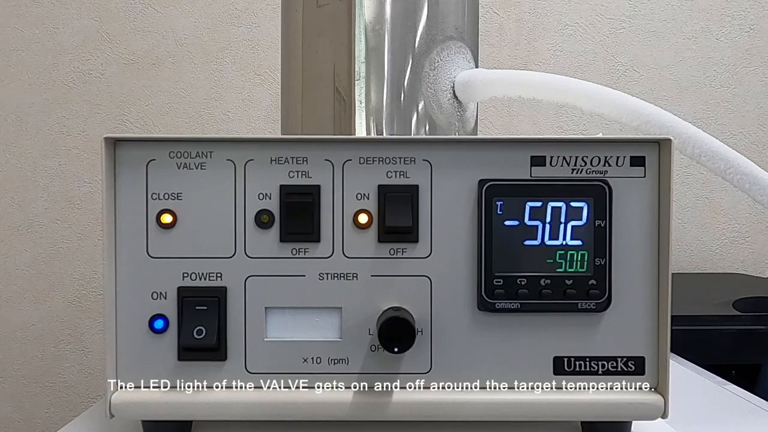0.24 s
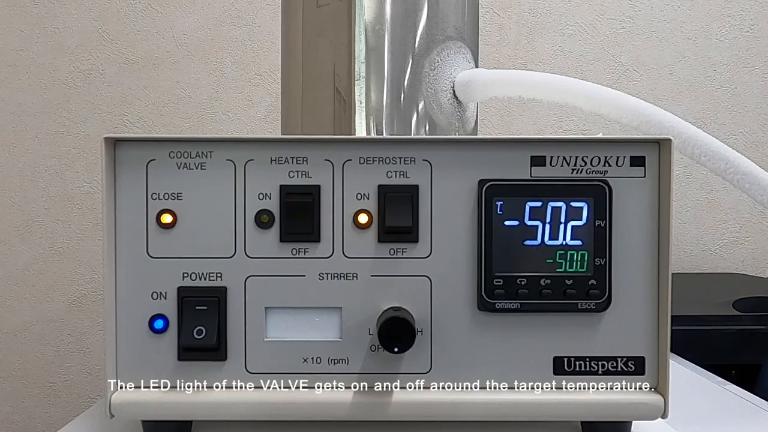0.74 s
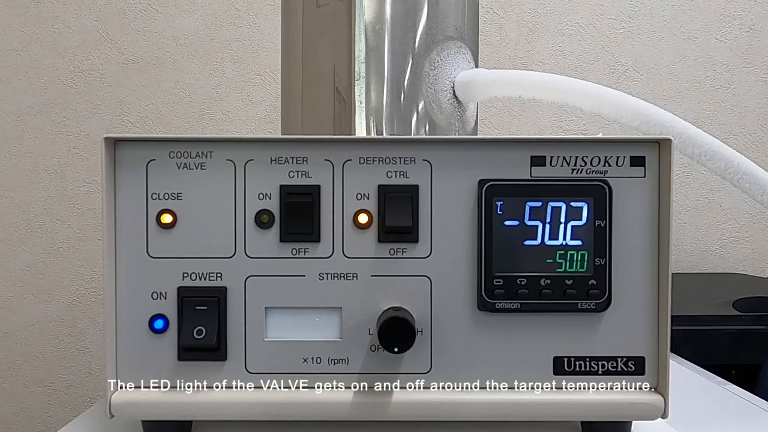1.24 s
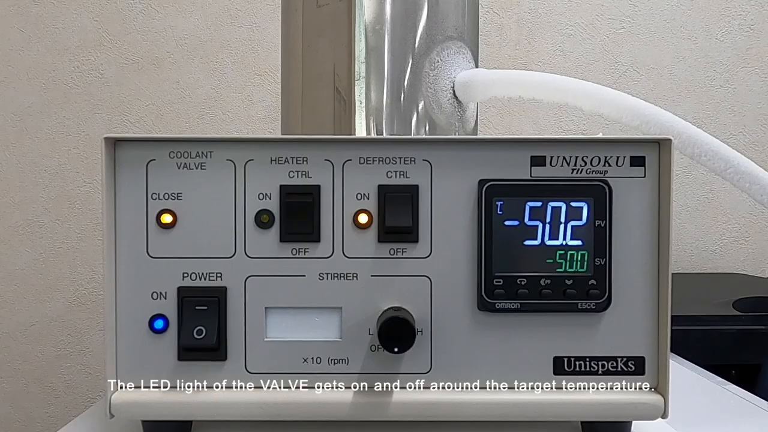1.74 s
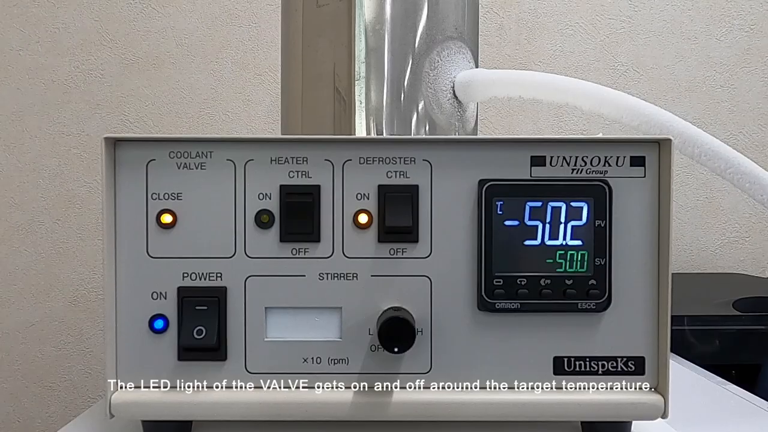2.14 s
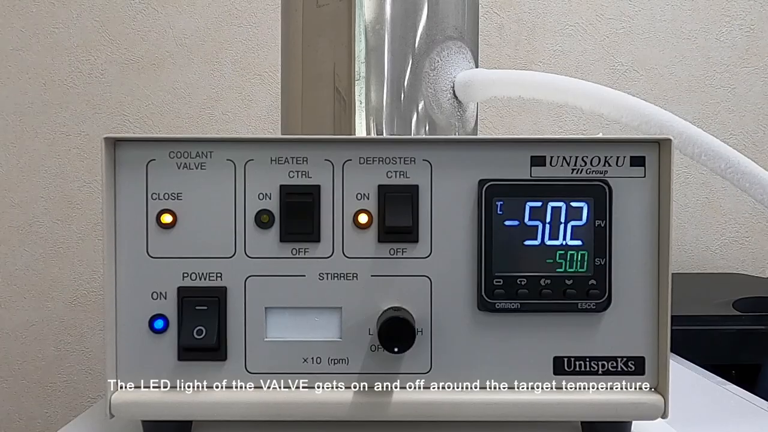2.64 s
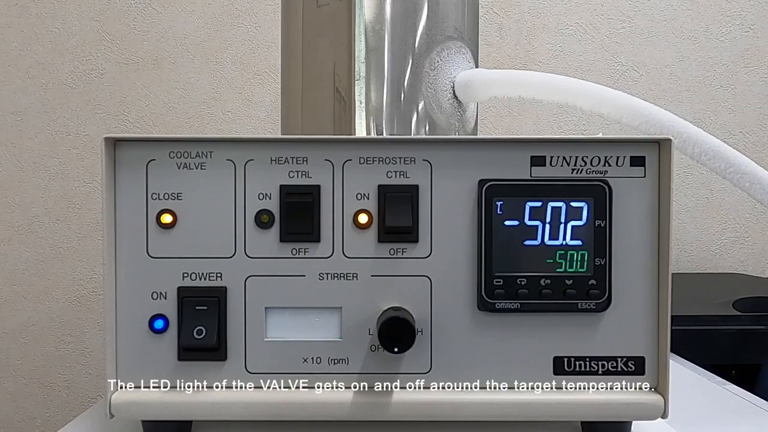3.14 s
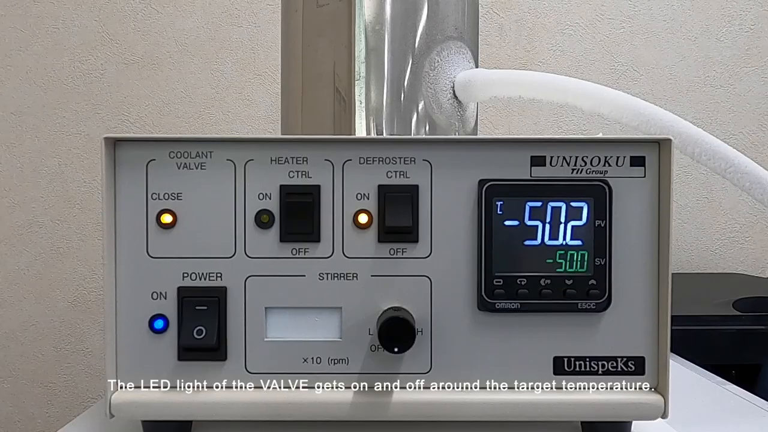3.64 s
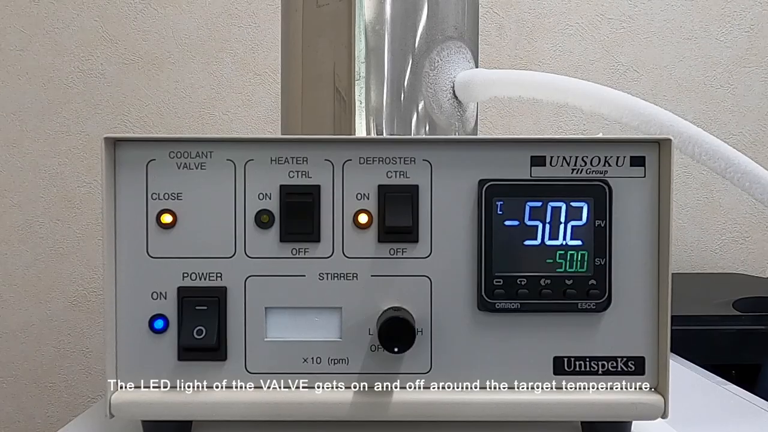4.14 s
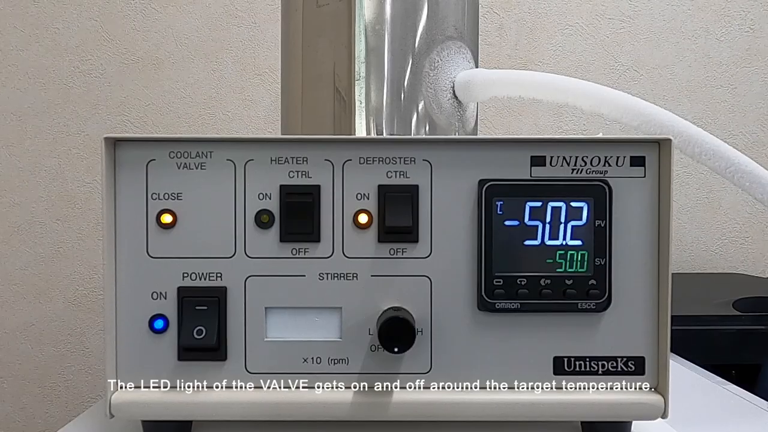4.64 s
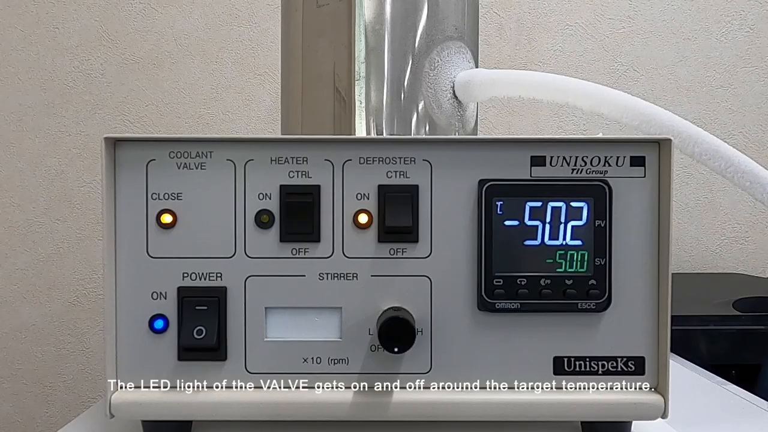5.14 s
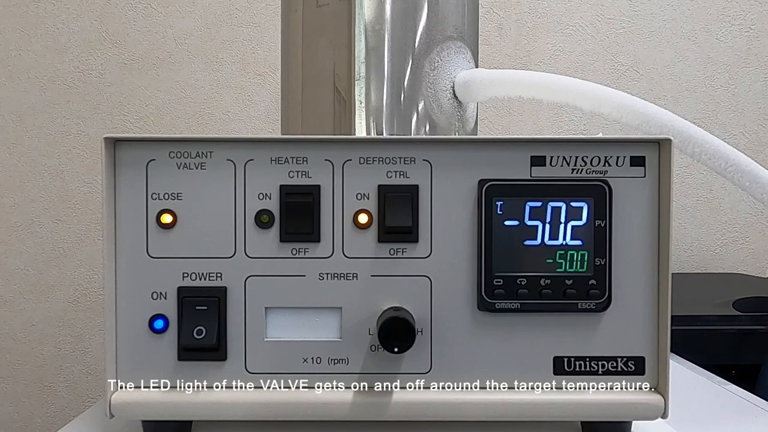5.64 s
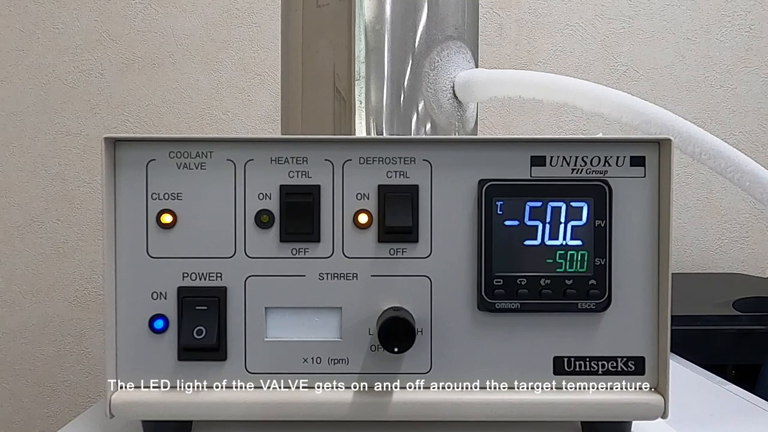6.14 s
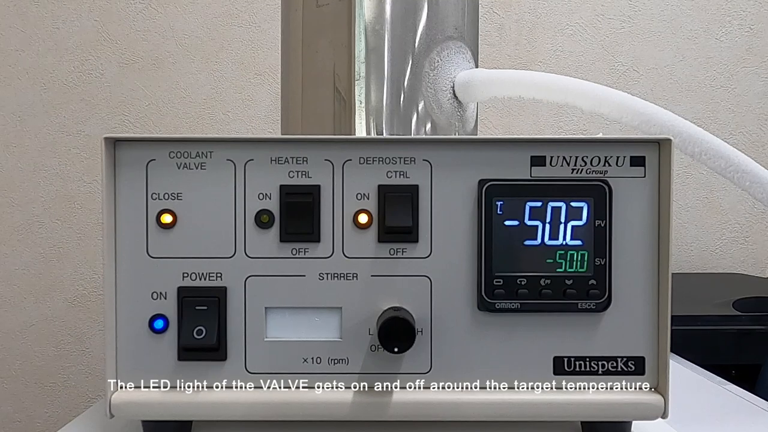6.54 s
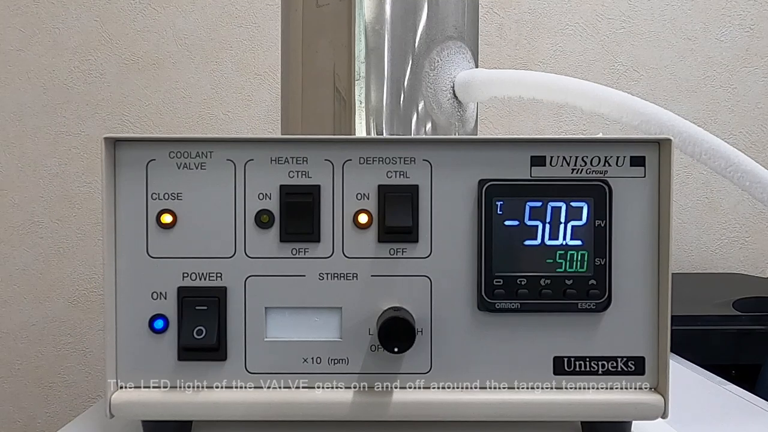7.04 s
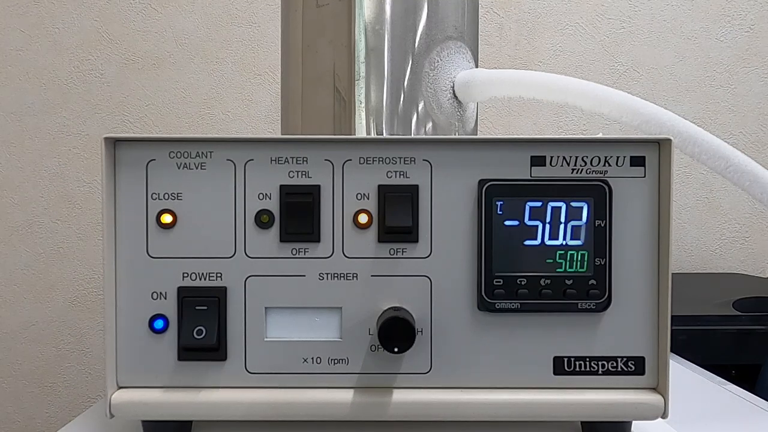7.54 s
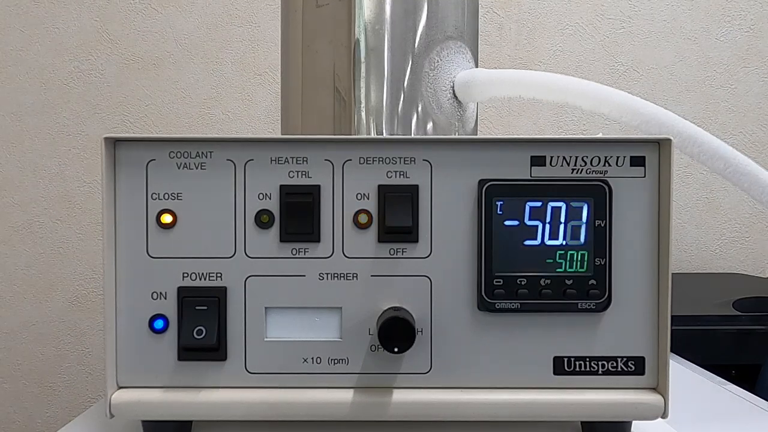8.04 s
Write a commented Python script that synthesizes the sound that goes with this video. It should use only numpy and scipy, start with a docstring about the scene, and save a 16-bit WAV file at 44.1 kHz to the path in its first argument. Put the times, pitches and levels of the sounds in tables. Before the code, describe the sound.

Low electrical hum and air rush fill a room, with faint, irregular metallic ticks and light patter from a small valve.

```python
"""A small valve and its metal fittings tick and rattle faintly on a laboratory bench.
Each contact rasps and makes the metal ring. Knocks patter on a panel near 900 Hz, short blips gurgle,
the treble crackles and a rustle swells late. A slow motor throbs as two close hums beat together,
and ventilation noise lies under everything. Near the end the stereo sound narrows to mono."""
import sys
import numpy as np
from scipy import signal
from scipy.fft import rfft, irfft, next_fast_len
from scipy.io import wavfile
from scipy.ndimage import uniform_filter1d, map_coordinates

SR = 44100
rng = np.random.default_rng(int(sys.argv[2]) if len(sys.argv) > 2 else 0)


def wav_record(signal):
    """Record a signal, one row per channel, as 16-bit PCM in the file named by sys.argv[1]."""
    frames = np.transpose(np.atleast_2d(signal))
    bounded = np.clip(frames, -1, 1)
    # unit amplitude maps onto the largest positive 16-bit level
    quanta = np.round(bounded * 32767).astype(np.int16)
    wavfile.write(sys.argv[1], SR, quanta)


N = 365569

# The valve's clear ticks: (time [s], level [dB], centre pitch [Hz], breadth [0 narrow to 1 wide])
VALVE_TICKS = [(0.1825, -49, 2440, 0.1), (0.2418, -54.5, 4250, 0.2), (0.3366, -54, 4140, 0),
               (0.4535, -62.5, 2910, 0.95), (0.5112, -57, 3700, 0.5), (0.5945, -67, 2680, 1),
               (0.638, -66.5, 5290, 0.6), (0.7831, -54, 5810, 0), (0.868, -62, 7700, 0),
               (0.9882, -59.5, 5940, 0.5), (1.0602, -66, 2540, 1), (1.332, -63.5, 4000, 0.8),
               (1.3741, -63, 8760, 0.1), (1.489, -65, 5360, 0), (1.6268, -53.5, 3150, 0.36),
               (1.6975, -58.5, 4650, 0.14), (1.835, -58.5, 4650, 0.7), (2.0058, -69, 5560, 1),
               (2.0322, -66, 4000, 0.7), (2.0862, -62, 2300, 1), (2.2214, -63, 4700, 0.7),
               (2.288, -67, 8400, 0), (2.3338, -59, 5970, 0.1), (2.3624, -51, 2150, 0.26),
               (2.54, -59, 5800, 0.73), (2.6389, -64, 8800, 0.4), (2.698, -60, 6300, 0.1),
               (2.7427, -63, 5850, 1), (2.879, -61, 4470, 0.13), (3.0662, -64, 6760, 0.15),
               (3.2856, -65, 3920, 1), (3.3787, -63, 5400, 0), (3.5369, -62, 3850, 1),
               (3.5997, -60, 4500, 0.1), (3.8094, -62.5, 8800, 0), (3.911, -65, 3960, 0.2),
               (4.3274, -66.5, 8900, 0.3), (4.536, -49, 2310, 0), (4.739, -56, 2540, 0.1),
               (4.785, -61, 4170, 0), (4.89, -65, 4970, 0.3), (4.9347, -60.5, 2300, 0.7),
               (5.0355, -63, 6950, 0.32), (5.083, -64, 4200, 0.1), (5.2033, -59, 4900, 0.4),
               (5.227, -52, 8950, 0.3), (5.2534, -57.5, 2200, 0.2), (5.256, -64, 5650, 0.1),
               (5.4555, -65.5, 4800, 0.8), (5.478, -66, 8600, 0.3), (5.525, -60.5, 3680, 0.6),
               (5.718, -71, 4900, 0), (5.7994, -57.5, 4370, 0.6), (5.8606, -64.5, 3980, 0.7),
               (5.9298, -64, 2120, 0.8), (5.9998, -62.5, 5860, 0.3), (6.055, -61.5, 2220, 0.6),
               (6.127, -61.5, 4250, 0.3), (6.2356, -59, 3700, 0.2), (6.2837, -56.5, 2390, 0),
               (6.5565, -61.5, 5940, 0.3), (6.75, -55, 8950, 0), (6.8287, -54.5, 3100, 0),
               (6.897, -67, 6100, 0.6), (7.057, -67.5, 6400, 0), (7.158, -65, 5300, 0),
               (7.1926, -56, 4050, 0.3), (7.3325, -59, 4800, 0.3), (7.3717, -57.5, 2350, 0.5),
               (7.5155, -65, 8000, 0.6), (7.6634, -56, 2600, 0.54), (7.79, -61, 2670, 0.3),
               (7.9165, -65, 3330, 1), (8.2033, -44.5, 1410, 0.27), (8.2133, -46.5, 1650, 0.3)]
# The metal's natural tones: (pitch [Hz], level [dB], time to fade by 60 dB [s])
METAL_TONES = [(2200, -3, .08), (2310, -4, .08), (2440, -3, .07), (2650, -6, .06), (2850, -8, .06),
               (3225, -3, .08), (3710, -9, .07), (3830, -6, .07), (4265, -6, .07), (4480, -8, .06),
               (4780, -8, .09), (4905, -5, .11), (5245, -6, .13), (5350, -5, .14), (5635, -9, .06),
               (5810, -2, .1), (6265, -6, .07), (6470, -6, .08), (7235, -10, .06), (9100, -7, .05)]
def valve_ticks():
    """Each contact makes a short rasp of noise and rings the metal's tones at new strengths."""
    out, t = np.zeros((2, N + SR)), np.arange(SR // 5) / SR
    hz, tone_db, fade_s = np.transpose(METAL_TONES)
    tone_fade = amp(-60 * t / fade_s[:, None])
    rise_s, rasp_fade_s, peak_width_hz = 0.0051, 0.088, 110
    rise, fade = 1 - np.exp(-t / rise_s), amp(-60 * t / rasp_fade_s)
    rasp_hz = np.fft.rfftfreq(len(t), 1 / SR)
    peaks = amp(tone_db - tone_db.mean()) * peak(rasp_hz[:, None], hz, peak_width_hz)
    metal_gain = (1 + amp(5) * peaks.sum(axis=1)) * (rasp_hz > 1050)  # the tones colour the rasp too
    weak_ticks = rng.uniform([0.76, -78.5, 2400, .1], [N / SR, -71, 8500, .6], size=(110, 4))
    for s, db, centre_hz, breadth in [*VALVE_TICKS, *weak_ticks]:
        strength = amp(tone_db + rng.normal(0, 3, hz.shape)) * tick_colour(hz, centre_hz, breadth) ** 2
        phase = rng.uniform(0, 2 * np.pi, hz.shape) + rng.normal(0, 0.25, (2, len(hz)))
        detuned_hz = hz * rng.normal(1, .007, hz.shape)  # each contact pulls the tones off pitch
        tones = tone_fade * np.exp(2j * np.pi * detuned_hz[:, None] * t)
        ringing = ((strength * np.exp(1j * phase)) @ tones).real
        noise = rng.standard_normal(len(t)) + 0.81 * rng.standard_normal((2, len(t)))
        gain = tick_colour(rasp_hz, centre_hz, breadth) * metal_gain
        random_colour = amp(rng.normal(0, 2.2, 150).repeat(30)[:len(rasp_hz)])
        rasp = irfft(rfft(noise) * gain * random_colour, len(t))
        chatter = uniform_filter1d(rng.standard_normal(len(t) // 90).repeat(90), 45)  # changes every 2 ms
        rasp_size = np.sqrt(np.mean(gain ** 2) * np.mean((rise * fade) ** 2))
        rasp = rasp_size * unit(rasp * rise * fade * amp(3.1 * chatter))
        ringing *= rise * amp(1.5 * chatter)
        out[:, round(s * SR):][:, :len(t)] += amp(db - 13) * ringing + amp(db + 4.5) * rasp
    return out[:, :N]


def tick_colour(hz, centre_hz, breadth):
    """How strong each pitch is in one tick: a narrow hump on a wide one, cut off in the high treble."""
    hump = lambda at_hz, octaves: np.exp(-.5 * (np.log2((hz + 1) / at_hz) / octaves) ** 2)
    narrow = hump(centre_hz, octaves=.11 + .2 * breadth)
    wide = amp(-20 + 19.5 * breadth) * hump(4700, octaves=1)
    return (narrow + wide) / (1 + (hz / 9700) ** 16)


# Strikes on the thin metal tone: (time [s], level [dB])
RING_STRIKES = [(.238, -69), (.76, -85.5), (1.15, -80), (2.36, -89), (4.54, -77), (4.96, -77), (5.25, -82),
                (5.6, -68), (6.08, -84), (6.84, -73.5), (7.398, -71), (7.87, -78.5)]
def metal_ring():
    """One thin tone of the rattling metal sounds faintly throughout and is struck now and then."""
    t = np.arange(N) / SR
    pitch_hz, rise_s, fade_s = 2250, .009, .42
    size = amp(-89.5 + 2 * wobble(4.1))
    for s, db in RING_STRIKES:
        age = np.maximum(t - s, 0)
        size += amp(db - 60 * age / fade_s) * (1 - np.exp(-age / rise_s))
    left_right = amp([[7.6], [5.4]] + 2 * wobble(7.3))
    return left_right * size * np.sin(2 * np.pi * pitch_hz * t + .6 * wobble(45))


# The clearest knocks on the panel: (time [s], level [dB])
PANEL_KNOCKS = [(0.124, -62), (0.31, -52.5), (0.494, -55), (0.685, -49.5), (0.726, -62), (0.814, -51),
                (0.915, -53), (1.038, -54.5), (1.164, -53.5), (1.359, -45), (1.456, -52), (1.696, -57),
                (1.832, -54), (1.86, -47.5), (1.978, -55), (2.232, -51.5), (2.33, -54), (2.44, -55),
                (2.581, -57), (2.656, -51.5), (2.685, -52), (2.896, -56.5), (3.009, -53.5), (3.094, -61),
                (3.194, -59), (3.245, -57.5), (3.312, -51.5), (3.496, -57.5), (3.657, -53.5), (3.675, -48),
                (4.456, -50), (4.612, -56), (4.641, -53), (4.745, -47.5), (4.927, -50.5), (4.958, -51),
                (5.026, -48), (5.088, -53), (5.216, -60), (5.314, -60), (5.476, -49.5), (5.695, -51),
                (5.877, -52), (5.893, -47.5), (5.964, -52), (6.084, -51), (6.275, -51), (6.528, -54.5),
                (6.677, -54), (6.708, -49), (6.77, -49.5), (7.161, -57.5), (7.209, -51.5), (7.305, -54),
                (7.62, -55), (8.034, -54)]
# The panel's natural tones: (pitch [Hz], width [Hz], level [dB])
PANEL_TONES = [(901, 3.1, -5.5), (921, 13.7, 3), (943.5, 23, -7.5), (953.6, 18, -1.5), (1052, 77, -6.5),
               (1302, 12, 5), (1358, 7.9, -2.5)]
def panel_patter():
    """Knocks, a random patter and faint noise shake the panel; a hollow box behind swells each knock."""
    def panel_and_box(hz):
        resonance = lambda pitch, width: 1j * hz * width / (pitch ** 2 - hz ** 2 + 1j * hz * width)
        panel = sum(amp(db) * resonance(pitch, width) for pitch, width, db in PANEL_TONES)
        return panel * resonance(pitch=930, width=110)

    blows = np.zeros(N)
    patter = rng.uniform([0, -68], [N / SR, -57], size=(280, 2))
    for s, db in [*PANEL_KNOCKS, *patter]:
        blows[int(s * SR)] = amp(db + 47.5)  # a blow is far stronger than the ringing it leaves
    knocks = filtered(blows, panel_and_box)
    murmur = amp(-67 + 2.7 * wobble(14)) * stereo_noise(panel_and_box)
    return murmur + knocks + amp(-25) * room_echo(knocks[None])


# Gurgling blips: (time [s], level [dB], starting pitch [Hz])
GURGLES = [(.421, -60.5, 1790), (.872, -51, 1080), (1.11, -60, 1850), (1.734, -52, 1090),
           (1.807, -53.5, 1360), (2.715, -52, 1240), (3.264, -50, 1054), (3.434, -53, 1075),
           (3.67, -59, 1810), (3.746, -51, 1310), (4.196, -53.5, 1820), (5.255, -58, 1790),
           (5.532, -52, 1090), (5.988, -50, 1075), (6.104, -56.5, 1790), (6.447, -60.5, 1790),
           (6.652, -61.5, 1780), (7.077, -52.5, 1090), (7.727, -56, 1820), (7.921, -54, 1465),
           (7.515, -63, 1810), (7.607, -63, 1800), (4.535, -57.5, 1790), (8.203, -49, 1380),
           (8.213, -48, 1530)]
def blips():
    """Brief tones start softly, rise a little in pitch and die away, like bubbles."""
    out, t = np.zeros(N + SR), np.arange(SR // 4) / SR
    rise_s, fade_s = .003, .035
    for s, db, hz in GURGLES:
        size = amp(db + 5 - 60 * t / fade_s) * (1 - np.exp(-t / rise_s))
        out[round(s * SR):][:len(t)] += size * np.sin(2 * np.pi * hz * t * (1 + 0.22 * t))
    return out[:N]


# The clear crackles: (time [s], level [dB])
CRACKLES = [(0.1975, -89), (0.4539, -82), (0.5816, -84), (0.6774, -84), (0.9777, -78), (1.0476, -78),
            (1.3753, -71), (2.0004, -77), (2.4229, -90), (2.633, -79), (2.7457, -75), (3.5384, -84),
            (3.8103, -80), (4.8945, -85), (5.035, -86), (5.2261, -70), (5.8621, -80), (5.9305, -71),
            (6.0542, -86), (6.7516, -77), (6.8688, -80), (7.224, -86), (7.3487, -71), (7.8716, -84),
            (7.9199, -78), (8.2043, -75)]
# Their tone colour: (pitch [Hz], level [dB])
CRACKLE_COLOUR = [(6000, -29.5), (8500, -3.5), (11500, -2.5), (13300, -7), (14300, -25.5)]
def crackles(fade_s=.06):
    """Dry bursts of high noise start at once and fade fast; tiny ones fall at random in between."""
    size, t = np.zeros(N + SR), np.arange(SR // 8) / SR
    tiny = rng.uniform([0, -99], [N / SR, -91], size=(40, 2))
    for s, db in [*CRACKLES, *tiny]:
        size[round(s * SR):][:len(t)] += amp(db - 5.5 - 60 * t / fade_s)
    return size[:N] * coloured_noise(CRACKLE_COLOUR)


# Brief fizzes: (middle time [s], length [s], level [dB])
FIZZ_SWELLS = [(0.46, .03, -93), (.71, .04, -95), (.87, .12, -99), (0.998, 0.076, -86.5), (1.392, .06, -88),
               (2.027, 0.1, -87), (2.252, .03, -101), (2.753, 0.042, -85), (3.36, .03, -95),
               (3.564, .05, -99), (3.67, .09, -99), (3.84, 0.081, -93), (4.753, 0.045, -95),
               (4.923, .07, -93), (5.236, 0.088, -84), (5.637, 0.18, -88), (5.903, 0.19, -87),
               (6.761, 0.057, -94), (6.883, 0.056, -90), (7.36, .05, -84.5), (7.933, .06, -90),
               (8.23, .07, -87)]
# Their tone colour: (pitch [Hz], level [dB])
FIZZ_COLOUR = [(8500, -40), (9800, 3.5), (11500, -2), (12400, -13), (13200, -40.5)]
def fizz():
    """Very high noise swells softly and sinks again."""
    t = np.arange(N) / SR
    size = sum(amp(db) * np.exp(-(2 * (t - s) / length) ** 4) for s, length, db in FIZZ_SWELLS)
    return size * patchy(coloured_noise(FIZZ_COLOUR), spread_db=1.5)


# How the rustle grows: (time [s], level [dB])
RUSTLE_SWELL = [(0, -110), (7.5, -100), (7.75, -66.5), (8.1, -70.5), (8.29, -61.5)]
# Its tone colour: (pitch [Hz], level [dB])
RUSTLE_TONE = [(600, -38.5), (1000, 0.5), (1500, -1), (3000, -8.5), (5000, -12.5), (9000, -40),
               (11000, -100)]
def rustle():
    """Uneven noise swells into a nearby rustle at the end."""
    size = amp(over_time(RUSTLE_SWELL)[0] + 3.6 * wobble(25))
    return size * patchy(coloured_noise(RUSTLE_TONE), spread_db=3)


# Dips in the motor's throb: (time [s], stronger hum's level [dB], weaker hum's share [0 to 1])
THROB_DIPS = [(0.13, -31.5, 0.41), (0.95, -30.5, 0.2), (1.778, -31, 0.4), (2.741, -30.5, 0.93),
              (3.718, -31, 0.33), (4.402, -28, 0.09), (5.008, -31.5, 0.74), (5.55, -28.5, 0),
              (6.007, -33.5, 0.6), (6.841, -28.5, 0.92), (7.85, -37, 1)]
# The hum at three times the shaft speed: (time [s], level [dB])
THIRD_HUM = [(0.0, -45), (1.85, -46), (2.24, -41), (2.45, -54), (3.72, -37), (3.85, -58), (5.26, -39.5),
             (5.33, -49.5), (6.53, -49.5), (7.04, -55), (7.18, -37.5), (7.57, -59), (8.08, -37),
             (8.29, -53)]
def motor(shaft_hz=21.35):
    """The motor hums at 1, 2, 3 and 4 times its shaft speed; a close hum beats against the second."""
    t = np.arange(N) / SR
    dip_s, strong_db, share = np.transpose(THROB_DIPS)
    beat_s = [dip_s[0] - 0.73, *dip_s, dip_s[-1] + 0.73]  # one more beat at each end
    beat = 2 * np.pi * np.interp(t, beat_s, np.arange(len(beat_s)))
    throb = amp(np.interp(t, dip_s, strong_db)) * (1 - np.interp(t, dip_s, share) * np.exp(1j * beat))
    angle = 2 * np.pi * shaft_hz * t
    first = amp(-47 + 4 * wobble(1.5)) * np.sin(angle + 0.21 * wobble(4.4))
    second = (throb * np.exp(2j * angle + 0.058j * wobble(13))).imag
    third = amp(over_time(THIRD_HUM)[0] + 2.5 * wobble(3.6)) * np.sin(3 * angle + .5 * wobble(1.2))
    fourth = amp(-53 + 0.6 * wobble(4.8)) * np.sin(4 * angle + 1.2 * wobble(5))
    return np.sqrt(2) * (first + second + third + fourth)


# The fan's fuzzy tones: (pitch [Hz], width [Hz], level [dB])
FAN_TONES = [(389.5, 20, -67.5), (511.3, 22, -71), (564, 12, -78.5), (711, 13, -78.5), (4770, 27, -90.5),
             (3245, 41, -88.5)]
def fan_whine():
    """The fan gives narrow bands of noise, heard as faint unsteady tones."""
    hz, width_hz, db = np.transpose(FAN_TONES)[:, :, None]
    bands = stereo_noise(lambda f: (amp(db) / np.sqrt(width_hz) * peak(f, hz, width_hz)).sum(axis=0))
    return np.linalg.norm(amp(db)) * amp(2.1 * wobble(4)) * bands


# The air's high sounds: (time [s], hiss level [dB], sizzle level [dB])
HISS_LEVELS = [(0.0, -72, -80.5), (0.34, -76, -92), (1.15, -74, -87.5), (1.61, -77.5, -90),
               (1.91, -71.5, -86), (2.63, -78.5, -87.5), (2.88, -76, -93.5), (3.42, -74.5, -90),
               (3.85, -76, -91.5), (5.54, -75.5, -86.5), (5.7, -73, -87), (5.91, -72, -87),
               (6.67, -77, -90.5), (7.55, -76.5, -90.5), (7.92, -71.5, -80.5), (8.29, -77, -80.5)]
# The air's low rush: (time [s], level [dB])
RUSH_LEVELS = [(0.0, -51), (0.81, -51.5), (1.13, -50.5), (2.31, -51.5), (7.78, -51), (8.29, -47)]
# Tone colours of the air's five layers, low to high: (pitch [Hz], level [dB])
RUMBLE_COLOUR = [(7.1, -31.5), (12, -7.5), (32, 5), (54, -4), (72, -1.5), (110, -24), (140, -48),
                 (240, -120)]
RUSH_COLOUR = [(56, -27.5), (95, -22.5), (107, 0.5), (151, -8), (275, -7.5), (391, -16), (442, -22.5),
               (513, -21.5), (665, -27), (724, -24.5), (832, -28), (880, -36), (1140, -33.5), (1940, -120)]
MIDDLE_COLOUR = [(600, -40.5), (860, -12), (1200, -10.5), (1340, -11.5), (1660, -18), (2050, -19.5),
                 (2280, -16), (2550, -20.5), (3200, -24), (4200, -52), (7000, -120)]
HISS_COLOUR = [(1820, -18.5), (3100, -10.5), (3520, -6.5), (3750, -3), (4780, -6), (6510, -5),
               (8000, -14.5), (10400, -39), (17600, -120)]
SIZZLE_COLOUR = [(6500, -23), (7600, -12.5), (9200, -9), (9900, -22.5), (10400, -35), (12400, -55.5)]
def ventilation():
    """Moving air makes five layers of noise; the middle swells with the hiss and the treble flickers."""
    hiss_db, sizzle_db = over_time(HISS_LEVELS)
    flutter_db = 2 * wobble(12)
    rumble = amp(-37) * coloured_noise(RUMBLE_COLOUR)
    rush = amp(over_time(RUSH_LEVELS)[0] + 1.5) * coloured_noise(RUSH_COLOUR)
    middle_db = -66.5 + 0.62 * (hiss_db - hiss_db.mean()) + 0.24 * wobble(7.6)
    middle = amp(middle_db) * patchy(coloured_noise(MIDDLE_COLOUR), spread_db=2)
    hiss = amp(hiss_db + flutter_db) * patchy(coloured_noise(HISS_COLOUR), spread_db=2)
    sizzle_db += flutter_db + 3.5 * wobble(22)
    sizzle = amp(sizzle_db) * patchy(coloured_noise(SIZZLE_COLOUR), spread_db=1.5)
    return rumble + rush + middle + hiss + sizzle


# How long the room rings: (pitch [Hz], time to fade by 60 dB [s])
ROOM_FADE = [(500, 0.21), (3000, 0.36), (10000, 0.062)]
def room_echo(x):
    """The room answers a sound with a short tail in which each pitch dies at its own speed."""
    hz, t, spectrum = signal.stft(rng.standard_normal((2, SR // 2)), SR, nperseg=256)
    fade = amp(-60 * t / over_pitch(ROOM_FADE, hz)[:, None])
    tail = signal.istft(spectrum * fade, SR, nperseg=256)[1]
    return signal.fftconvolve(x, tail / np.linalg.norm(tail[0]), axes=1)[:, :N]


# How alike the noise is on the left and right: (pitch [Hz], likeness [0 to 1])
STEREO_LIKENESS = [(40, 1), (125, 0.98), (300, 0.86), (600, 0.8), (1200, 0.63), (2600, 0.37), (5600, 0.13),
                   (10000, 0.16)]
def stereo_noise(gain):
    """Noise shaped by gain(hz), centred in the bass and wide in the treble."""
    def mid_and_side(hz):
        spread = np.arccos(over_pitch(STEREO_LIKENESS, hz)) / 2
        return gain(hz) * [np.cos(spread), np.sin(spread)]

    mid, side = filtered(rng.standard_normal((2, N)), mid_and_side)
    return unit(np.array([mid + side, mid - side]))


def coloured_noise(colour):
    """Stereo noise with the tone colour of a table."""
    return stereo_noise(lambda hz: amp(over_pitch(colour, hz)))


def patchy(x, spread_db):
    """Turn small patches of time and pitch up or down at random."""
    spectrum = signal.stft(x, nperseg=512)[2]
    patches = rng.standard_normal(spectrum.shape[1:])
    patches = uniform_filter1d(uniform_filter1d(patches, 5, axis=0), 5, axis=1)
    return unit(signal.istft(spectrum * amp(spread_db * unit(patches)), nperseg=512)[1][:, :N])


def filtered(x, response):
    """Scale and delay each pitch in x by response(hz)."""
    size = next_fast_len(N + SR // 2)
    return irfft(rfft(x, size) * response(np.fft.rfftfreq(size, 1 / SR)), size)[..., :N]


def peak(hz, centre_hz, width_hz):
    """A gain of 1 at the centre that falls away on both sides."""
    return 1 / (1 + (2 * (hz - centre_hz) / width_hz) ** 2)


def wobble(rate):
    """A smooth random curve through rate new values a second."""
    return map_coordinates(rng.standard_normal(int(N * rate / SR) + 4), [np.arange(N) * rate / SR])


def over_time(rows):
    """Join a table's timed points into one curve for each later column."""
    s, *columns = np.transpose(rows)
    return [np.interp(np.arange(N) / SR, s, column) for column in columns]


def over_pitch(rows, hz):
    """Read between a table's (pitch, value) points, spacing octaves evenly."""
    pitches, values = np.transpose(rows)
    return np.interp(np.log(hz + 1), np.log(pitches + 1), values)


def amp(db):
    """Turn decibels into a gain."""
    return 10 ** (np.asarray(db) / 20)


def unit(x):
    """Scale a signal to an average power of 1."""
    return x / np.sqrt(np.mean(x ** 2) + 1e-20)


def scene():
    """Add up all the sources, with room echo on the ticks and blips."""
    ticks, gurgles = valve_ticks(), blips()
    background = motor() + ventilation() + fan_whine() + fizz() + rustle()
    rattle = panel_patter() + metal_ring() + crackles()
    echo = room_echo(amp(-4.5) * ticks + amp(-12) * gurgles)
    return ticks + rattle + gurgles + background + echo


# How the two microphones differ: (pitch [Hz], left minus right [dB])
MIC_BALANCE = [(40, 0.5), (100, 0.2), (400, -0.7), (1400, 1), (3000, 2), (6000, 0.5), (9000, -2.5)]
# The stereo width, closing to mono: (time [s], gain of the left-right difference [dB])
STEREO_WIDTH = [(0, -1), (7.55, -1.5), (7.8, -10.5), (7.95, -25), (8.05, -57), (8.29, -98)]
def record(dry):
    """Two microphones differ a little in colour and the left hears slightly late; the end is mono."""
    left_delay_s, highest_hz = 3.5e-5, 14300
    half = np.array([[.5], [-.5]])  # each side takes half of the difference
    balance = lambda hz: amp(half * over_pitch(MIC_BALANCE, hz))
    left, right = filtered(dry, lambda hz: balance(hz) * np.exp(-2j * np.pi * half * hz * left_delay_s))
    mid = (left + right) / 2
    side = (left - right) / 2 * amp(over_time(STEREO_WIDTH)[0])
    return filtered(np.array([mid + side, mid - side]), lambda hz: hz < highest_hz)


dry = scene()
out = record(dry)
wav_record(out)
```